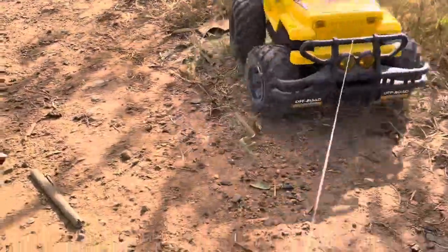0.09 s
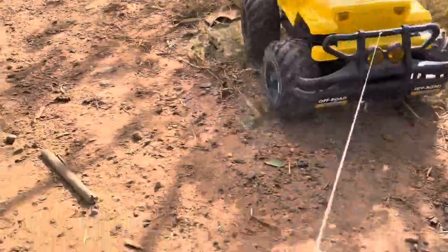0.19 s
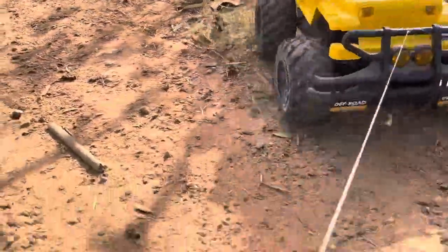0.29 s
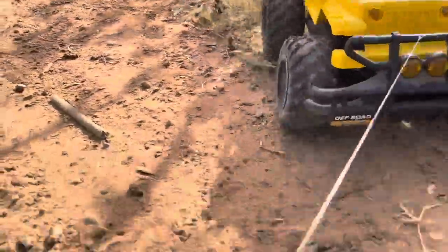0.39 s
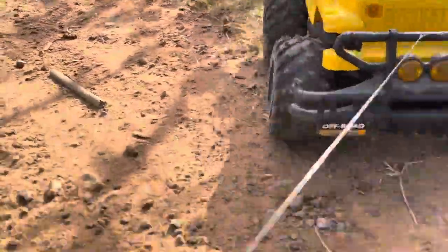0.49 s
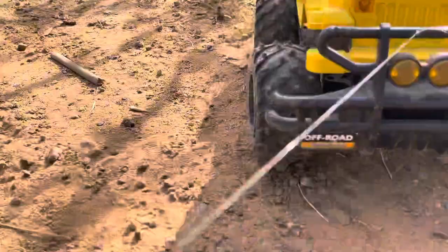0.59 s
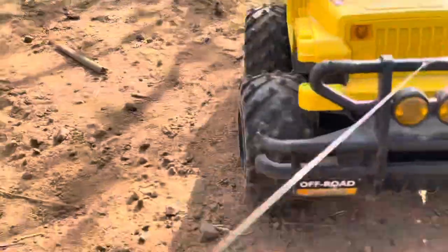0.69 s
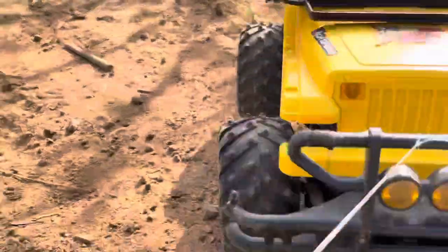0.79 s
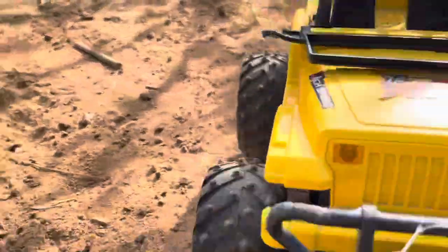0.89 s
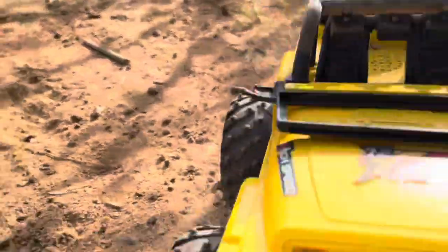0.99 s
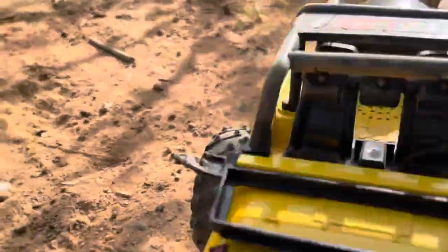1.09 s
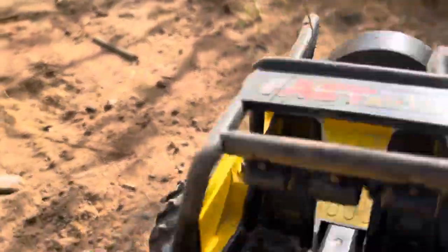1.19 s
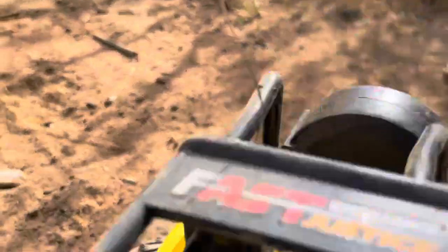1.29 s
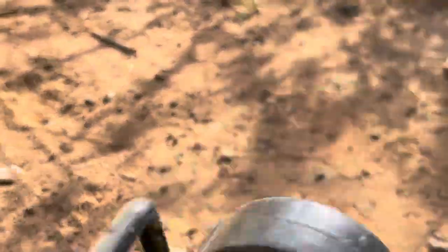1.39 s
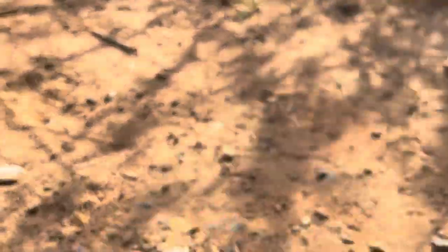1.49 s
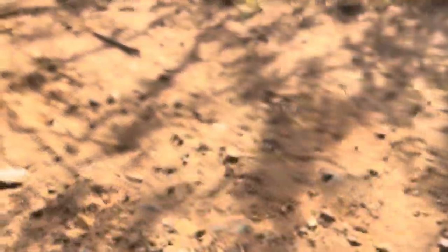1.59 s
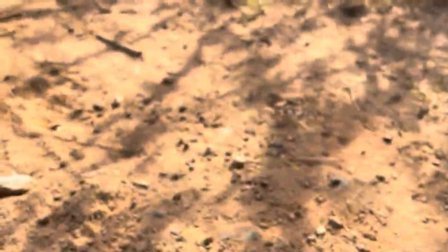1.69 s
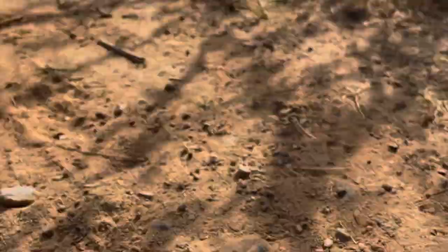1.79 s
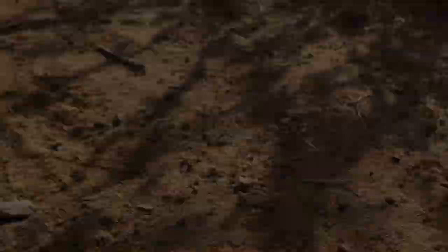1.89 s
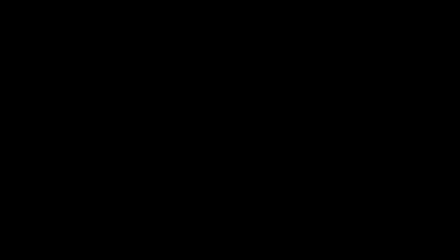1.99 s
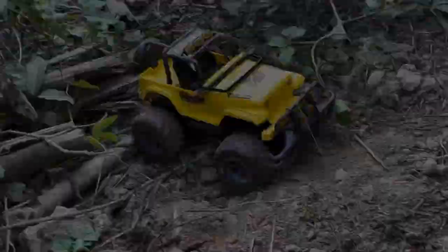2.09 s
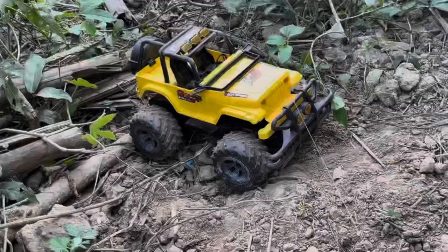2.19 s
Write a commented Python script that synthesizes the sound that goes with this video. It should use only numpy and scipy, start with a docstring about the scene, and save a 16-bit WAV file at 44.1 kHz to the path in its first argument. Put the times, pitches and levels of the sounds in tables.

```python
"""Faint crunches of dry soil and leaves come first, then swell as a toy truck is hauled past a microphone.
Grit and leaves are banded noise grains, dry stems snap as filtered noise bursts with a hollow knock. Rubbing
plastic squeaks, then dry leaves give three tiny high rings, all as clicks ringing one resonance. Ground rumble,
wheel growl and thumps fill the bass. After a cut to a quieter spot, low pulses that sag in pitch throb over
faint hiss, with one small tick."""
import sys
import numpy as np
from scipy import signal
from scipy.fft import rfft, irfft
from scipy.io import wavfile
from scipy.ndimage import uniform_filter1d

SR = 44100
rng = np.random.default_rng(int(sys.argv[2]) if len(sys.argv) > 2 else 0)


def dump(signal):
    """Clip the signal to [-1, 1] and save it as 16-bit WAV at the path in sys.argv[1]."""
    limited = np.clip(np.atleast_2d(signal).T, -1, 1)
    pcm = np.round(limited * 32767).astype(np.int16)
    wavfile.write(sys.argv[1], SR, pcm)


N = 97020

# Low throbs of the quiet spot, before the fade-in: (centre [s], peak [dB])
THROBS = [(2.021, -49), (2.05, -34.5), (2.109, -36.5), (2.1644, -35)]
# Spectrum of the hiss in the quiet spot: (frequency [Hz], relative density [dB per Hz])
HISS_COLOUR = [(18, -35), (30, -11), (100, 0), (230, -13.5), (423, -27.5), (1710, -31.5), (2240, -22.5),
               (3010, -21), (3840, -37.5), (9060, -30.5), (9760, -26), (10500, -75), (22000, -110)]
# Rumble through the ground: (time [s], level [dB])
RUMBLE_LEVEL = [(0, -57), (.03, -53), (.12, -59.5), (.4, -47.5), (.53, -51), (.62, -48), (.74, -45),
                (.9, -45.5), (1.1, -43), (1.3, -38), (1.52, -37.5), (1.6, -54.5), (1.76, -55), (1.82, -64),
                (2.01, -54)]
# Spectrum of that rumble: (frequency [Hz], relative density [dB per Hz])
RUMBLE_COLOUR = [(15, -49), (30, -26), (48, -6), (64, 3), (130, 0), (210, -6), (340, -31), (550, -48)]
# Growl of the wheels rolling close by: (time [s], level [dB])
GROWL_LEVEL = [(0.0, -64), (0.21, -58), (0.23, -48.5), (0.51, -54), (0.59, -40), (0.62, -56), (0.73, -39),
               (1.01, -44.5), (1.02, -37.5), (1.15, -47.5), (1.17, -30.5), (1.21, -52), (1.27, -32),
               (1.3, -38), (1.45, -30.5), (1.61, -59), (1.72, -56), (2.01, -57)]
# Heavy thumps of the passing truck: (centre [s], pitch [Hz], peak [dB])
THUMPS = [(.03, 70, -45), (.11, 70, -46), (.24, 300, -36), (.4, 75, -38), (.585, 200, -33),
          (.59, 70.5, -36), (0.75, 160, -30), (.95, 200, -33), (1.07, 100, -36), (1.11, 115, -34),
          (1.17, 190, -27), (1.199, 59.4, -34), (1.264, 315, -24), (1.267, 168, -20), (1.287, 65, -24),
          (1.355, 59.5, -30), (1.412, 111, -43), (1.44, 318, -25), (1.449, 82, -32), (1.479, 119, -23.5),
          (1.5, 139, -28), (1.536, 152, -30), (1.92, 170, -44)]
# Squeaks of rubbing plastic, then three tiny high rings of dry leaves:
# (centre [s], length [s], pitch [Hz], level [dB])
SQUEAKS_AND_LEAF_RINGS = [(0.444, 0.021, 1935, -29.5), (0.499, 0.0061, 1920, -29.5),
                          (0.614, 0.03, 2010, -27), (0.887, 0.033, 1970, -30.5),
                          (1.179, 0.0097, 2020, -32.5), (1.787, .003, 8700, -31), (1.842, .004, 8600, -29),
                          (1.863, .005, 8500, -27)]
# Snapping stems: (time [s], crack peak [dB], crack centre [Hz], knock against crack [dB],
# knock pitch [Hz], left minus right [dB])
SNAPS = [(0.0782, -35, 8870, -10, 2380, 0.3), (0.2236, -20, 4460, -7, 1480, 3),
         (0.2741, -21, 3560, 4.5, 1390, -7), (0.4039, -15.5, 4750, -3, 1650, 0.3),
         (0.4149, -11.5, 3660, -11, 1500, 2), (0.524, -12, 8680, -8, 1610, 2),
         (0.5263, -10, 8800, -15.5, 1770, 10), (0.5272, -19, 3970, -19, 1530, 10),
         (0.6003, -15, 8930, -13, 2010, 6), (0.665, -23, 8830, -12, 829, 9),
         (0.7056, -16, 4000, -10, 1500, 16), (0.733, -19, 8720, -13, 1460, 4),
         (0.7449, -7, 3900, -6, 1470, 0.3), (0.8854, -12, 3600, -7, 1870, 2),
         (0.9959, -18, 3610, -5, 1900, 2), (1.025, -16, 9210, -17, 1380, 2),
         (1.0899, -11, 3370, -2, 1900, 2), (1.1179, -14.5, 3450, -5, 1650, 2),
         (1.2538, -11, 3500, -6, 1470, -4), (1.4291, -4, 7600, -10, 2000, -1),
         (1.503, -14, 8360, -10, 1730, 0.3), (1.5421, -6, 9130, -11.5, 2070, 5),
         (1.6243, -3, 7960, -15, 2180, 3), (1.626, -3, 5400, -6.5, 2040, 2),
         (1.6421, -21, 6230, -7, 1920, 10), (1.6568, -5, 8400, -16, 1420, 1.5),
         (1.6769, -16, 4600, -4, 2080, 7), (1.6796, -10.5, 8370, -11, 2370, 4),
         (1.6832, -2.5, 8850, -14.5, 2760, 2), (1.7307, -5.5, 9100, -15, 1960, 0.3),
         (1.7642, -19, 5290, -15, 1770, 2), (1.7846, -20, 8630, -13, 1040, 0.3),
         (1.802, -15, 8400, -10, 2770, 0.3), (1.8202, -20, 6050, -11, 1450, 0.3),
         (1.83, -21, 8510, -10, 2340, 0.3), (1.8392, -20, 8230, -9, 2620, 0.3),
         (1.8576, -15, 8460, -12, 2720, 2), (1.9082, -14, 8750, -9.5, 1710, 0.3),
         (1.9428, -22.5, 8500, -6, 1360, 0.3)]
# Partials of the hollow knock: (multiple of knock pitch [ratio], level [dB], 60 dB decay time [s])
KNOCK_PARTIALS = [(1, -2, 0.013), (1.72, -6, 0.0045)]
# Crunches, before colouring: (centre [s], length [s], soil thud [dB], grit [dB], leaf rustle [dB])
CRUNCHES = [(0.014, 0.024, -48, -43, -46.5), (0.041, 0.02, -44.5, -61, -62),
            (0.083, 0.012, -75, -45, -44.5), (0.126, 0.024, -56, -41, -47), (0.147, 0.021, -48.5, -44, -40),
            (0.174, 0.023, -48.5, -55, -61), (0.24, 0.0098, -32, -30, -32.5),
            (0.274, 0.007, -35.5, -32, -53), (0.298, 0.03, -37, -34, -38.5),
            (0.347, 0.036, -38, -30.5, -38.5), (0.415, 0.015, -37.5, -26, -28),
            (0.445, 0.02, -44, -36, -37.5), (0.474, 0.017, -53, -29.5, -34), (0.495, 0.014, -42, -45, -41),
            (0.527, 0.0054, -33.5, -19, -26), (0.578, 0.019, -30.5, -26, -34.5),
            (0.629, 0.027, -46, -29, -43), (0.665, 0.0091, -39, -35, -39.5), (0.705, 0.0071, -38, -21, -22),
            (0.745, 0.0026, -47, -17, -22.5), (0.759, 0.016, -33, -22.5, -26),
            (0.793, 0.026, -39, -24.5, -40), (0.821, 0.009, -31, -31, -41), (0.845, 0.0084, -41, -50, -46),
            (0.879, 0.017, -29.5, -29, -29), (0.954, 0.021, -29.5, -20, -27.5),
            (1.003, 0.011, -32, -28.5, -53), (1.015, 0.02, -36, -32, -39), (1.027, 0.012, -20.5, -20, -25),
            (1.064, 0.05, -37.5, -27, -29.5), (1.094, .006, -27, -24, -40), (1.107, 0.013, -29.5, -39, -48),
            (1.155, 0.034, -37, -27.5, -38.5), (1.175, 0.025, -34.5, -25, -34.5),
            (1.195, 0.018, -39, -29.5, -30), (1.23, 0.016, -37, -30, -48),
            (1.261, 0.019, -26.5, -21, -29.5), (1.315, 0.0057, -40, -29, -28.5),
            (1.351, 0.026, -35, -31, -34), (1.382, 0.026, -55, -34, -39), (1.43, 0.014, -29.5, -43, -18.5),
            (1.51, 0.017, -30, -28.5, -25), (1.547, 0.0073, -35, -31, -13.5), (1.569, 0.011, -47, -49, -23),
            (1.59, 0.0093, -47, -47, -26), (1.653, 0.018, -56, -30, -54), (1.691, 0.0065, -54, -42, -31),
            (1.767, 0.01, -35.5, -37.5, -26.5), (1.788, 0.0084, -61, -47, -29),
            (1.803, 0.007, -53, -37, -25), (1.82, .008, -53, -52, -36), (1.832, .008, -51, -38, -24),
            (1.844, 0.0097, -64, -32, -28.5), (1.861, 0.0089, -61, -42, -29.5),
            (1.912, 0.012, -40.5, -36, -27), (1.949, 0.0028, -44, -37, -41), (2.005, 0.02, -51.5, -38, -36)]
# Steady rolling under the crunches, before colouring: (time [s], soil thud [dB], grit [dB], leaf rustle [dB])
ROLLING = [(0, -63, -54.5, -51), (.2, -63, -46.5, -55), (.23, -44, -38, -43.5), (.39, -43, -40, -46),
           (.46, -49, -38.5, -41), (.59, -44.5, -31.5, -40), (.68, -45.5, -38.5, -44),
           (.72, -39.5, -28.5, -40.5), (.735, -36.5, -24.5, -37.5), (.78, -37, -32.5, -36.5),
           (.92, -42.5, -33, -38), (1.08, -39, -32.5, -43.5), (1.21, -47, -42, -40.5),
           (1.28, -36, -33, -37.5), (1.408, -39, -31, -41), (1.44, -41, -23.5, -25.5),
           (1.468, -32.5, -30.5, -25.5), (1.478, -40, -38.5, -45), (1.6, -46.5, -34.5, -37),
           (1.71, -40.5, -43, -50), (1.84, -52, -39.5, -39), (1.88, -50, -45, -46),
           (1.92, -47.5, -38.5, -46.5), (2.01, -59.5, -56, -51)]
# Tone colour of the tyre noise: (frequency [Hz], gain [dB])
TYRE_COLOUR = [(220, -22), (500, -10), (750, -5), (1000, -8), (1420, -4), (2000, -5.5), (2600, -9),
               (4600, -7), (6500, -12), (8700, -7), (10500, -1), (16000, -37)]
# Share of the power from the large grains, in the mid signal: (soil [0-1], grit [0-1], rustle [0-1])
BIG_SHARE = (0.08, 0.52, 0.49)
# Stereo side level of the tyre noise: (frequency [Hz], gain [dB])
TYRE_SIDE = [(60, -13.5), (200, -15), (700, -18), (1290, -9), (2400, -13), (4400, -13.5), (8000, -11.5),
             (15000, -28.5)]
# Stereo width as the truck passes, widest at the end: (time [s], gain added to the side [dB])
WIDTH = [(0, -7), (.4, -9.5), (.9, -7), (1.1, -6), (1.5, 4.5), (2.01, 9.5)]
# Lean of the truck's midrange to one side: (time [s], left minus right [dB])
PAN = [(0.0, 3), (0.13, 0.5), (0.91, 1.5), (1.38, 4), (1.76, 2.5), (1.96, -2.5), (2.01, 1)]
# Microphone response: (frequency [Hz], gain [dB])
MIC_RESPONSE = [(25, -7), (50, -0.5), (5000, 0), (6500, -1), (8700, 3), (9600, 2), (10300, -2),
                (11700, -8.5), (12800, -12), (13700, -37), (15200, -16), (16500, -40)]
# Phase between the two microphone ports: (frequency [Hz], lead of the left port [rad])
PORT_PHASE = [(0, 0), (6720, 0.11), (8180, 0.88), (8870, -0.7), (9910, -2.5), (10900, -3.5), (11600, -6),
              (12700, -4.5), (12900, -5), (13200, -9.2), (14200, -8), (14700, -11), (15100, -13.5),
              (16400, -12.3)]

THROB_HZ, THROB_SAG_HZ_PER_S, THROB_S = 98, 3100, 0.0091  # pitch at the centre, its fall, bell width
HISS_DB, HISS_SIDE_DB = -50.5, -10  # the side gain comes on top of the level
TICK_S, TICK_DB = 2.083, -47
GROWL_HZ, GROWL_WIDTH_HZ = 276, 325
RUMBLE_SIDE_DB, THUMP_CYCLES = -6, 0.89
CLICKS_PER_S, RING_WIDTH = 1200, 0.14  # clicks driving squeaks and rings; width as a share of the pitch
SNAP_S, SNAP_LAG_S = 0.0003, 0.0004  # rise to the peak of the burst, wait before it
SNAP_WIDTH, SNAP_BROAD_DB = 0.39, -8  # share of the crack centre; gain of the crack's wide edge
DEBRIS_DB, DEBRIS_S, DEBRIS_PER_S = -15, 0.006, 1800
SOIL_HZ, GRIT_HZ, LEAF_HZ = 566, 2200, 7460  # where each material rules
GRAINS_PER_S, BIG_GRAINS_PER_S = 9000, 1800
GRAIN_SPREAD_DB, GRAIN_TOP_DB = 2.5, 9  # mean excess over the smallest grain before capping, and the cap
FLICKER_DB, FLICKER_PER_S = (-0.65, 1.8, 2.5), 150  # depth in soil, grit, rustle; each band on its own
CLUMP_DB, CLUMP_PER_S = (-0.5, 2, 2.5), 200  # depth in soil, grit, rustle; all bands together
CRUNCH_RISE, CRUNCH_FALL, CRUNCH_LEAD = 0.25, 0.53, 0.13  # shares of length; the peak leads the centre
CRUNCH_FALL_SHAPE = 1.43  # 1 = exponential, 2 = bell
PAN_BASS_HZ, PAN_BASS_SHARE, PAN_TOP_HZ = 900, 0.44, 6200  # bass leans less, treble not at all
CUT_S, GAP_S, FADE_IN_S = 2.0128, 0.0054, 0.0054
TOP_HZ = 16250
T = np.arange(N) / SR
OPPOSED = np.array([[1], [-1]])  # left up, right down


def undb(db):
    """Decibels to amplitude."""
    return 10 ** (np.asarray(db) / 20)


def on_log(hz, table):
    """Read a spectrum table along a logarithmic frequency axis."""
    points = np.array(table)
    return np.interp(np.log(hz), np.log(points[:, 0]), points[:, 1])


def over_time(table, column=1):
    """Draw a time table's column as an automation curve."""
    points = np.array(table)
    return np.interp(T, points[:, 0], points[:, column])


def band(x, hz, width_hz):
    """Resonant band-pass, gain 1 at the centre."""
    return signal.lfilter(*signal.iirpeak(min(hz, 0.45 * SR), hz / width_hz, fs=SR), x)


def twice_band(x, hz, width_hz):
    """Two equal resonances in a row, for steeper skirts."""
    return band(band(x, hz, width_hz), hz, width_hz)


def unit(x):
    """Scale to rms 1."""
    return x / np.sqrt(np.mean(x ** 2))


def coloured(table, channels):
    """Noise of a given spectrum, rms 1."""
    hz = np.maximum(np.fft.rfftfreq(N, 1 / SR), 1)
    spectrum = rfft(rng.standard_normal((channels, N)))
    return unit(irfft(spectrum * undb(on_log(hz, table)), N))


def walk(rate):
    """Random levels held for 1 / rate seconds and slewed."""
    hold = int(SR / rate)
    steps = rng.standard_normal(N // 20)[np.arange(N) // max(hold, 20)]
    return 1.13 * uniform_filter1d(steps, hold)


def grains(per_s):
    """Scattered clicks of either sign, a few much larger than the rest, rms 1."""
    chance, sign, size = rng.random((3, N))
    size_db = np.minimum(-GRAIN_SPREAD_DB * np.log(size + 1e-9), GRAIN_TOP_DB)
    return unit((chance < per_s / SR) * np.sign(sign - 0.5) * undb(size_db))


def quiet_spot():
    """Low bell-shaped pulses that sag in pitch, faint hiss and one small tick."""
    throb = 0
    for t, db in THROBS:
        u = T - t
        sagging_hz = THROB_HZ - THROB_SAG_HZ_PER_S * u / 2  # half the sag, as phase integrates pitch
        throb = throb + undb(db) * np.exp(-(u / THROB_S) ** 2 / 2) * np.cos(2 * np.pi * sagging_hz * u)
    mid, side = coloured(HISS_COLOUR, channels=2) * undb(HISS_DB)
    side = undb(HISS_SIDE_DB) * band(side, 910, 2600)
    tick_noise = band(band(rng.standard_normal(N), 3600, 5400), 3600, 5200)
    tick = undb(TICK_DB) * np.exp(-((T - TICK_S) / 0.0023) ** 2) * tick_noise
    return throb + tick + mid + side * OPPOSED


def rumble():
    """Ground-borne bass and the growl of the wheels, with heavy thumps as the truck passes."""
    growl = unit(twice_band(rng.standard_normal((2, N)), GROWL_HZ, GROWL_WIDTH_HZ))
    ground = coloured(RUMBLE_COLOUR, channels=2)
    mid, side = ground * undb(over_time(RUMBLE_LEVEL)) + growl * undb(over_time(GROWL_LEVEL))
    thumps = 0
    for t, hz, db in THUMPS:
        cycles = (T - t) * hz
        thumps = thumps + undb(db) * np.exp(-(cycles / THUMP_CYCLES) ** 2) * np.cos(2 * np.pi * cycles)
    side_gain = undb(RUMBLE_SIDE_DB + over_time(WIDTH) / 2)  # bass takes half the widening
    return thumps + mid + side_gain * side * OPPOSED


def squeaks_and_leaf_rings():
    """Brief runs of clicks ring one resonance: stick-slip in rubbing plastic, then tiny rings of dry leaves."""
    clicks, out = grains(CLICKS_PER_S), 0
    for t, length, hz, db in SQUEAKS_AND_LEAF_RINGS:
        ringing = unit(twice_band(clicks, hz, RING_WIDTH * hz))
        out = out + undb(db) * np.exp(-2 * ((T - t) / length) ** 2) * ringing
    return out


def snaps():
    """A stem breaks with a sharp crack, a crackle of debris after it, and a short hollow knock."""
    out, noise, debris = np.zeros((2, N)), rng.standard_normal(N), grains(DEBRIS_PER_S)
    for t, db, hz, knock_db, knock_hz, pan_db in SNAPS:
        start = int(t * SR)
        i = slice(start, start + 2000)
        u = np.maximum(T[i] - t - SNAP_LAG_S, 0)
        burst = noise[i] * u / SNAP_S * np.exp(1 - u / SNAP_S)
        crackle = (u > 0) * debris[i] * undb(DEBRIS_DB) * np.exp(-u / DEBRIS_S)
        push, width_hz = burst + crackle, SNAP_WIDTH * hz
        core = band(push, hz, width_hz) * np.sqrt(SR / (np.pi * width_hz))  # offsets the narrow band's loss
        crack = core + undb(SNAP_BROAD_DB) * band(push, hz, 2 * hz)
        crack = crack / np.max(np.abs(crack))
        knock = 0
        for multiple, partial_db, t60 in KNOCK_PARTIALS:
            ring = np.sin(2 * np.pi * multiple * knock_hz * u) * 1000.0 ** (-u / t60)
            knock = knock + undb(knock_db + partial_db) * ring
        out[:, i] += undb(db + OPPOSED * pan_db / 2) * (crack + knock)
    return out


def tyre_levels_db():
    """Soil, grit and rustle levels: rolling plus crunches in power, then shared random clumping."""
    power = np.array([undb(2 * over_time(ROLLING, column)) for column in (1, 2, 3)])
    for t, length, *db in CRUNCHES:
        peak = t - CRUNCH_LEAD * length
        u = (T - peak) / (length * np.where(T < peak, CRUNCH_RISE, CRUNCH_FALL))
        swell = np.exp(-np.where(u < 0, u ** 2, np.abs(u) ** CRUNCH_FALL_SHAPE))
        power += undb(2 * np.array(db))[:, None] * swell
    return 10 * np.log10(power) + np.outer(CLUMP_DB, walk(CLUMP_PER_S))


def tyres():
    """Breaking grains in third-octave bands; every crunch swells them with its own balance."""
    level_db, big_grains, out = tyre_levels_db(), grains(BIG_GRAINS_PER_S), 0
    for hz in 250 * 2 ** (np.arange(19) / 3):
        # 0 = soil, 1 = grit, 2 = rustle, blended in between
        place = np.interp(np.log(hz), np.log([SOIL_HZ, GRIT_HZ, LEAF_HZ]), range(3))
        k = min(int(place), 1)
        blend_db = level_db[k] * (k + 1 - place) + level_db[k + 1] * (place - k)
        flicker_db = np.interp(place, range(3), FLICKER_DB) * walk(FLICKER_PER_S)
        gain = undb(blend_db + on_log(hz, TYRE_COLOUR) + flicker_db)
        gain = gain * np.sqrt(SR / hz * 3)  # offsets the loss of power in a narrow band
        share = np.clip(np.interp(place, range(3), BIG_SHARE), 0, 1)
        mid = np.sqrt(share) * big_grains + np.sqrt(1 - share) * grains(GRAINS_PER_S)
        side = grains(GRAINS_PER_S)
        mid, side = (twice_band(v * gain, hz, hz / 3) for v in (mid, side))
        side_gain = undb(on_log(hz, TYRE_SIDE) + over_time(WIDTH))
        out = out + mid + side_gain * side * OPPOSED
    return out


def lean(truck):
    """Pan by frequency: midrange fully, bass in part, treble left even."""
    def low(hz):
        return signal.sosfiltfilt(signal.butter(2, hz, fs=SR, output="sos"), truck)

    pan_db = over_time(PAN) * OPPOSED / 2
    bass, body = low(PAN_BASS_HZ), low(PAN_TOP_HZ)
    treble, midrange = truck - body, body - bass
    return treble + midrange * undb(pan_db) + bass * undb(PAN_BASS_SHARE * pan_db)


def scene():
    """The passing truck, a hard cut with a tiny gap, then the quiet spot."""
    truck = lean(rumble() + squeaks_and_leaf_rings() + snaps() + tyres())
    fade_out = np.clip((CUT_S - T) / 0.0007, 0, 1)
    fade_in = np.clip((T - CUT_S - GAP_S) / FADE_IN_S, 0, 1) ** 2
    return truck * fade_out + quiet_spot() * fade_in


def record(dry):
    """The microphone fades at the top as its two ports drift in phase; peaks are rounded, the top cut."""
    hz = np.fft.rfftfreq(N, 1 / SR) + 1  # keeps the logarithm finite
    turn = np.exp(0.5j * on_log(hz, PORT_PHASE) * OPPOSED)
    heard = irfft(rfft(dry) * turn * undb(on_log(hz, MIC_RESPONSE)), N)
    top_cut = signal.ellip(8, 0.2, 80, TOP_HZ, fs=SR, output="sos")
    return signal.sosfilt(top_cut, np.tanh(heard))


dry = scene()
out = record(dry)
dump(out)
```